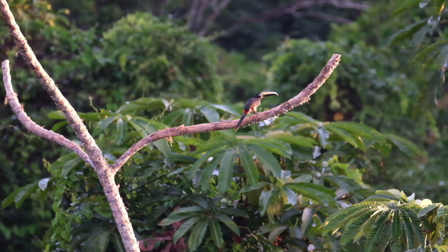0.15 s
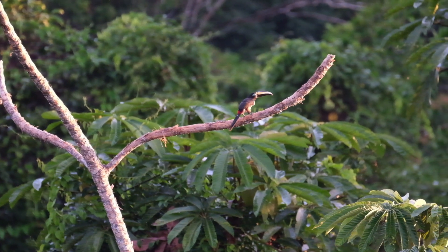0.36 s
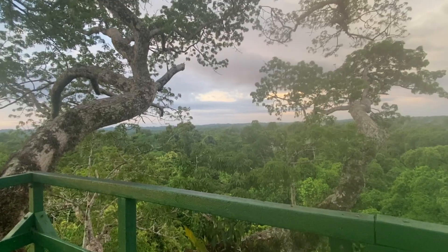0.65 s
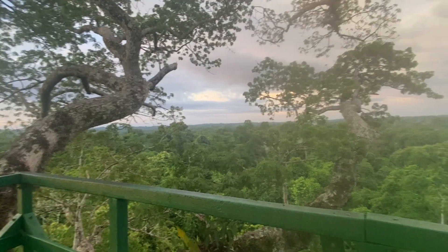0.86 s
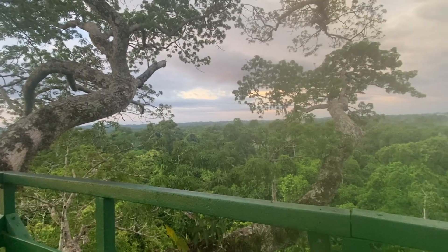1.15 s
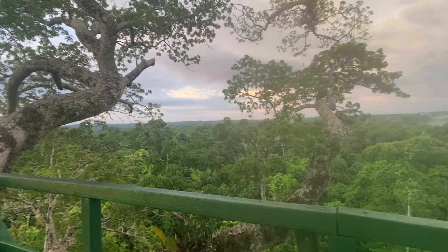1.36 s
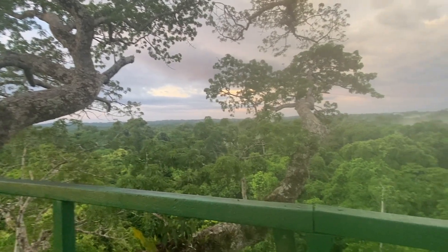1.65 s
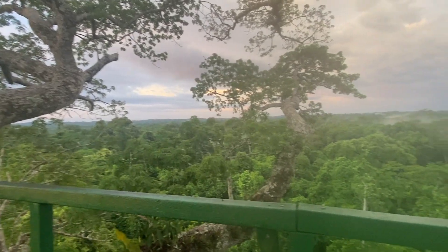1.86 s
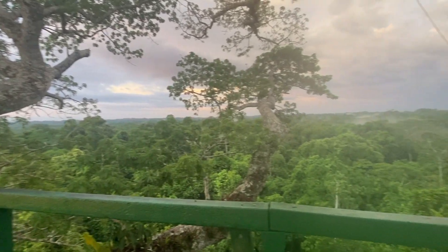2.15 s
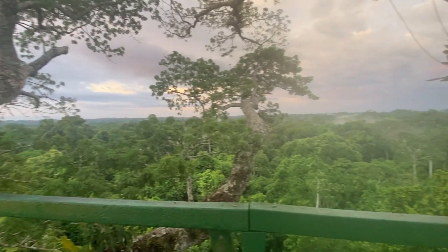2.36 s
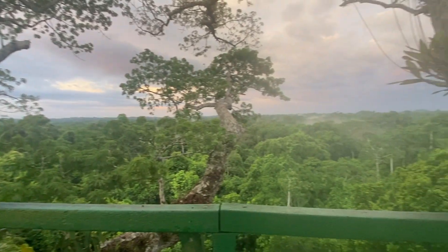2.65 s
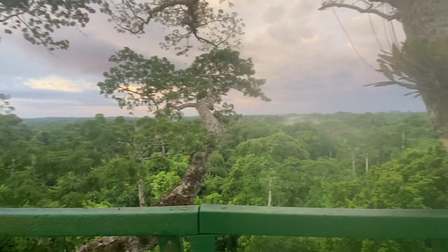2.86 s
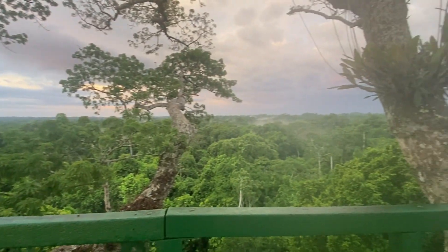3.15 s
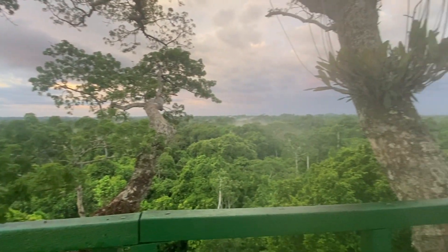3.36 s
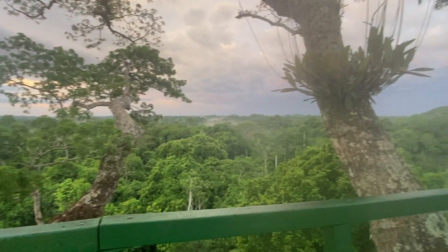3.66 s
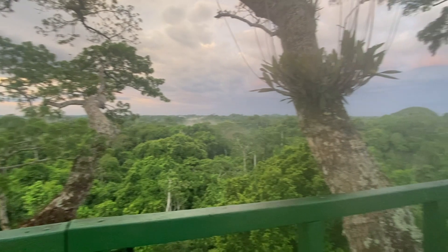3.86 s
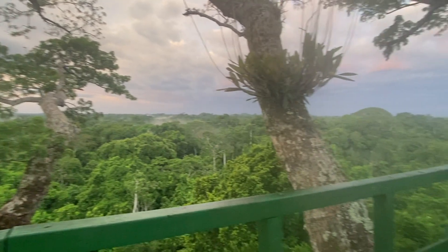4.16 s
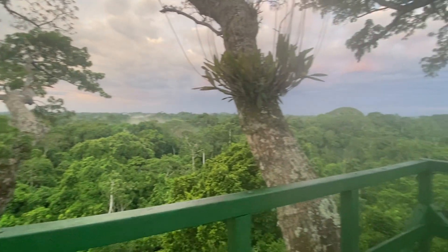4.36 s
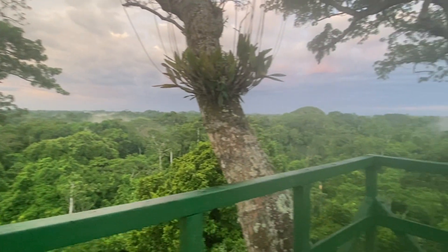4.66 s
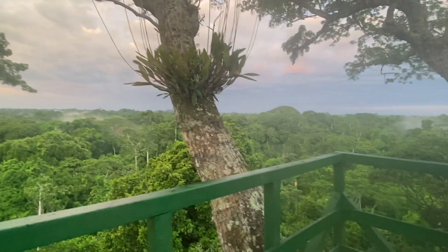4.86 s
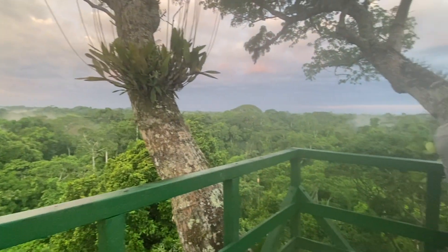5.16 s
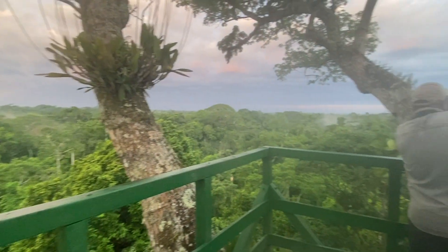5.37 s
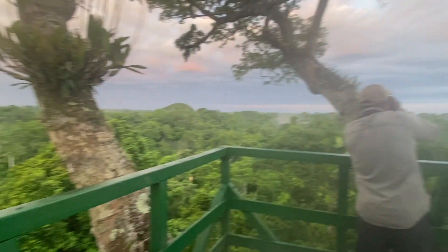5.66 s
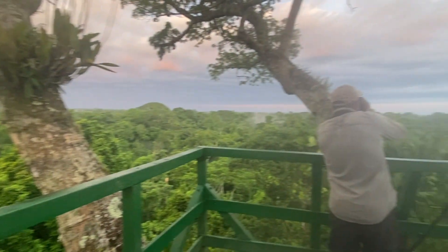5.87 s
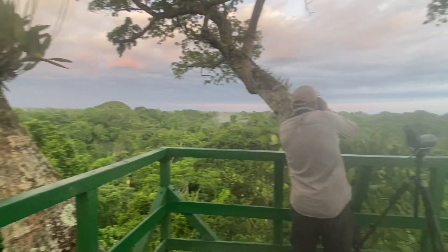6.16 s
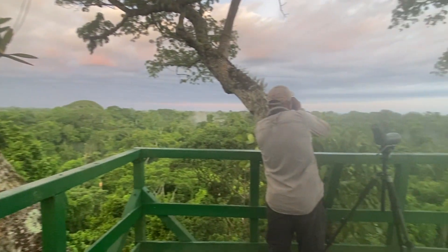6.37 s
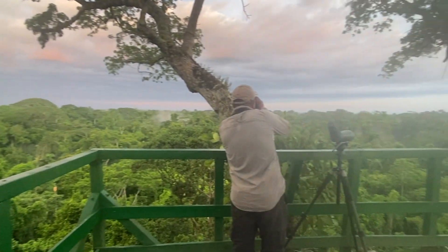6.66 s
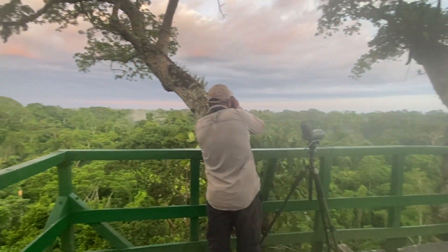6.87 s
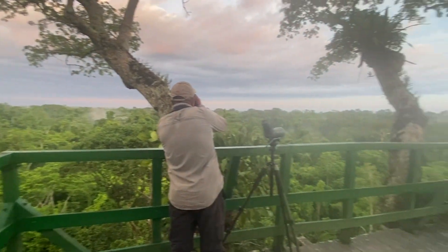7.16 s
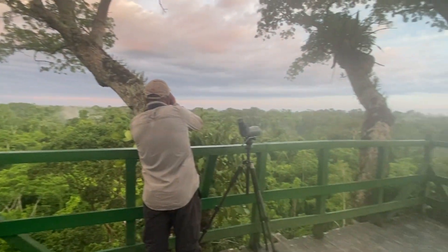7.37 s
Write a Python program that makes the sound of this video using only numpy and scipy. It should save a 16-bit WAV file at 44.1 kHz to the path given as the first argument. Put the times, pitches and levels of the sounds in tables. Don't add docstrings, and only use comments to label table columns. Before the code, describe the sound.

A stereo microphone in the open on a treetop platform catches steady insect hiss, rasping katydids and leafy background. Piping two-note bird calls come first, growing louder then softer, with a sharp chip and very high rising squeals. Later come gliding whistles, a long sagging note, faint coos and a climbing series. Low wind buffets and dull taps run throughout, broken by one hard casing clatter with a short motor whine.

```python
import sys
import numpy as np
from scipy import signal
from scipy.fft import rfft, irfft, next_fast_len
from scipy.io import wavfile
from scipy.ndimage import uniform_filter1d, minimum_filter1d, map_coordinates

SR = 44100
rng = np.random.default_rng(int(sys.argv[2]) if len(sys.argv) > 2 else 0)


def generate_wav(sig):
    pcm = np.round(np.clip(np.atleast_2d(sig).T, -1, 1) * 32767).astype(np.int16)
    wavfile.write(sys.argv[1], SR, pcm)


def invert_db(x):
    u = np.asarray(x, float) / 20
    return 10 ** u


N = 330750


def unit(x):
    return x / np.sqrt(np.mean(x ** 2) + 1e-20)


def along(points, hz):
    f, v = np.transpose(points)
    return np.interp(np.log(hz + 1), np.log(f + 1), v)


def curves(rows):
    s, *columns = np.transpose(rows)
    return [np.interp(np.arange(N) / SR, s, column) for column in columns]


def swells(rows):
    t = np.arange(N) / SR
    return sum(invert_db(db) * np.exp(-((t - s) / half) ** 2) for s, db, half in rows)


def wobble(rate):
    at = np.arange(0, N + 16, 16)
    knots = rng.standard_normal(int(N * rate / SR) + 4)
    return np.interp(np.arange(N), at, map_coordinates(knots, [at * rate / SR]))


def filtered(x, response):
    m = next_fast_len(N + SR // 2)
    return irfft(rfft(x, m) * response(np.fft.rfftfreq(m, 1 / SR)), m)[..., :N]


def coloured(x, spectrum):
    return unit(filtered(x, lambda hz: invert_db(along(spectrum, hz))))


def sides(pan_db):
    return invert_db(np.array([pan_db, -pan_db]) / 2)


def pair(alike):
    a, b = rng.standard_normal((2, N))
    turn = np.arccos(np.clip(alike, -1, 1)) / 2
    return np.array([np.cos(turn) * a + np.sin(turn) * b, np.cos(turn) * a - np.sin(turn) * b])


# (frequency [Hz], reverberation time [s])
TREE_DECAY = [(500, 1), (2300, 1.2), (8500, 1.1), (11000, .75)]


def trees(x):
    near_db, near_t60 = -4, .25
    _, t, z = signal.stft(hiss := rng.standard_normal((2, SR * 2 // 3)), SR, nperseg=256)
    hz = np.fft.rfftfreq(256, 1 / SR)
    far = invert_db(-60 * t / along(TREE_DECAY, hz)[:, None])
    near = invert_db(near_db - 60 * t / near_t60)
    tail = signal.istft(z * (far + near), SR, nperseg=256)[1]
    delayed = np.pad(x, (500, 0))[None]
    return signal.fftconvolve(delayed, tail / np.linalg.norm(tail[0]), axes=1)


def whistle(notes, pan_db, lead, wet_db, waver_db, partner=2, partner_db=-60, shift_db=0, stray_hz=8):
    out = np.zeros((2, N + 2 * SR))
    waver = invert_db(waver_db * wobble(60) + shift_db)
    stray = stray_hz * wobble(25)
    for note in notes:
        s, hz, db = np.transpose(note)
        n = np.arange(round(s[0] * SR), min(round(s[-1] * SR), N))
        t = n / SR
        hz = uniform_filter1d(np.interp(t, s, hz), size=SR // 150) + stray[n]
        edge = np.clip(np.minimum(t - s[0], s[-1] - t) / 0.0093, 0, 1)
        phase = 2 * np.pi * np.cumsum(hz) / SR + np.array([[lead], [-lead]]) / 2
        tone = np.sin(phase) + invert_db(partner_db) * np.sin(partner * phase)
        dry = np.sqrt(2) * invert_db(np.interp(t, s, db)) * edge * waver[n] * tone
        echo = invert_db(wet_db) * trees(dry[0])
        out[:, n] += sides(pan_db)[:, None] * dry
        out[:, n[0]:n[0] + echo.shape[1]] += echo
    return out[:, :N]


def drawn(length, top_hz, scoop_hz, settle, sag_hz, bend, attack, fade_db):
    t = np.linspace(0, length, 40)
    u = t / length
    hz = top_hz - scoop_hz * np.exp(-t / settle) - sag_hz * u ** bend
    db = 20 * np.log10(1.05 - np.exp(-t / attack)) - fade_db * u
    return np.transpose([t, hz, db])


def sung(shape, starts):
    return [np.array(shape) + [s, 0, db] for s, db in starts]


PIPER_ARCH = (.125, 2425, 400, .03, 110, 14, .025, 2)
PIPER_DROOP = (.105, 2385, 380, .008, 160, 3, .011, 6)
# (time [s], first note level [dB], second note level [dB])
PIPER_CALLS = [
    (.342, -51, -52),
    (.92, -52, -49.5),
    (1.519, -46, -45),
    (2.129, -44, -43.5),
    (2.791, -48.5, -51),
]


def piper():
    reply_s = .169
    first = sung(drawn(*PIPER_ARCH), [(s, db) for s, db, _ in PIPER_CALLS])
    second = sung(drawn(*PIPER_DROOP), [(s + reply_s, db) for s, _, db in PIPER_CALLS])
    return whistle(first + second, -0.33, -0.23, wet_db=-2.5, waver_db=5, shift_db=-.4, stray_hz=14)


# (time [s], pitch [Hz], level [dB])
ANSWER_NOTES = [
    [(3.14, 2470, -76), (3.18, 2547, -66), (3.28, 2615, -63.5), (3.37, 2630, -63.5), (3.42, 2390, -68)],
    [(3.49, 2810, -55), (3.54, 2950, -58), (3.59, 2670, -63), (3.7, 2370, -59.5), (3.74, 2140, -65)],
]
# (time from start [s], pitch [Hz], level [dB])
QUERY_NOTE = [(0, 2190, -2), (.06, 2240, -3), (.13, 2440, -1), (.19, 2470, 0)]
# (time [s], level [dB])
QUERY_TIMES = [
    (4.465, -66),
    (4.915, -62),
]


def answerer():
    notes = ANSWER_NOTES + sung(QUERY_NOTE, QUERY_TIMES)
    return whistle(notes, -1.9, 1.0, wet_db=-5.5, waver_db=3.5)


MOURNER_SHAPE = (.66, 2070, 420, .025, 400, 2.2, .04, 10)
# (time [s], level [dB])
MOURNER_CALLS = [
    (.24, -63),
    (2.92, -77),
    (5.44, -61),
]


def mourner():
    notes = sung(drawn(*MOURNER_SHAPE), MOURNER_CALLS)
    return whistle(notes, -1, 1.0, wet_db=-3.5, waver_db=3.5, shift_db=-1.5)


RISER_SHAPE = (.365, 10950, 3400, .165, -300, 22, .04, 15)
RISER_UPPER_SHAPE = (.34, 13300, 3700, .27, 0, 1.1, .011, .5)
# (time [s], level [dB], upper voice level [dB], upper voice shift [Hz])
RISER_CALLS = [
    (1.21, -57, -84, 100),
    (3.11, -55, -82, 200),
    (5.28, -57, -80, 300),
    (7.126, -63, -88, 100),
]


def riser():
    lower = sung(drawn(*RISER_SHAPE), [row[:2] for row in RISER_CALLS])
    start, _, end = np.split(drawn(*RISER_UPPER_SHAPE), [7, 16])
    upper = [part + [s, hz, db] for s, _, db, hz in RISER_CALLS for part in (start, end)]
    return whistle(lower + upper, -2.7, 1.9, wet_db=-4.5, waver_db=4.5, shift_db=.8, stray_hz=40)


CHIP_SHAPE = (.035, 3000, -5200, .023, 0, 1.1, .011, 6)
# (time [s], pitch shift [Hz], level [dB])
CHIP_CALLS = [
    (2.262, 0, -42.5),
    (6.262, 500, -51),
]


def chips():
    notes = [drawn(*CHIP_SHAPE) + row for row in CHIP_CALLS]
    return whistle(notes, 2.81, 0.1, wet_db=-8, waver_db=2.2, partner_db=-40)


LADDER_SHAPE = (.1, 0, 10, .011, 110, 2.6, .012, 4)
# (time [s], pitch [Hz], level [dB])
LADDER_NOTES = [(6.3, 1480, -74), (6.515, 1545, -72), (6.72, 1580, -70), (6.93, 1600, -74),
                (7.12, 1645, -70), (7.315, 1665, -68)]


def ladder():
    notes = [drawn(*LADDER_SHAPE) + row for row in LADDER_NOTES]
    return whistle(notes, 0, 0.97, wet_db=-.6, waver_db=3.5, shift_db=-2.5, stray_hz=14)


COO_SHAPE = (1.01, 0, 15, .05, 12, 1.1, .03, 4)
# (time [s], length [s], pitch [Hz], level [dB])
DOVE_COOS = [(1.22, .22, 1282, -69), (1.5, .28, 1276, -71), (1.88, .3, 1240, -70), (5.89, .23, 1247, -69),
             (6.28, .52, 1250, -67), (6.94, .2, 1205, -67), (6.35, .75, 1335, -78), (7.23, .1, 1300, -65),
             (7.37, .09, 1335, -67), (7.43, .1, 1240, -69)]


def doves():
    notes = [drawn(length, hz, *COO_SHAPE[2:]) + [s, 0, db] for s, length, hz, db in DOVE_COOS]
    return whistle(notes, 0, -2.6, wet_db=-2.5, waver_db=3.5, shift_db=2.5, stray_hz=9)


# (time [s], length [s], from [Hz], to [Hz], level [dB])
FAR_SLURS = [(1.19, .045, 1970, 1792, -68), (1.235, .04, 1792, 1960, -69), (1.33, .115, 2090, 1800, -70),
             (1.72, .13, 1850, 2000, -71), (5.88, .09, 2030, 2120, -74), (6.1, .11, 2150, 2380, -76),
             (6.19, .11, 2180, 2310, -74), (6.33, .07, 2280, 2170, -73), (6.39, .05, 2040, 2150, -74),
             (6.44, .08, 2100, 1980, -74), (6.62, .06, 2110, 2130, -75), (5.95, .25, 1865, 1855, -77),
             (6.04, .05, 2240, 2320, -76), (7.4, .1, 2150, 2350, -75), (7.2, .04, 2000, 2350, -71),
             (3.3, .08, 1640, 1620, -77), (6.2, .11, 2030, 2120, -74), (6.92, .07, 2240, 2300, -75),
             (7.21, .025, 2090, 2030, -64), (1.55, .1, 1800, 1856, -69), (1.59, .03, 2600, 2640, -70),
             (1.61, .035, 2800, 2870, -67), (.44, .2, 1790, 1802, -77), (1.9, .14, 1793, 1860, -68)]


def murmur():
    notes = [[(s, start_hz, db), (s + length, end_hz, db)] for s, length, start_hz, end_hz, db in FAR_SLURS]
    return whistle(notes, -1.1, 1.1, wet_db=-1.5, waver_db=3.5, shift_db=-4)


def birds():
    return (piper() + answerer() + mourner() + murmur() + ladder()
            + doves() + riser() + chips())


# (frequency [Hz], density [dB per Hz])
CICADA_SPECTRUM = [(4500, -74), (4900, -14), (5150, -20), (5460, -9.5), (6220, 2), (7130, 2), (7650, -8),
                   (7850, -26), (8300, -29.5), (8800, -120)]


def cicadas():
    clicks = np.zeros((2, N))
    for rate, pan, lag in rng.uniform([90, -8, 0], [380, 8, 40], (16, 3)):
        cycles = np.cumsum(rate * (1 + .06 * wobble(3)) / SR)
        train = np.diff(np.floor(cycles), prepend=0)
        train[train > 0] = invert_db(3.5 * rng.standard_normal(int(train.sum())))
        train = unit(train)
        clicks += sides(pan)[:, None] * [train, np.roll(train, int(lag))]
    mix = .5 * unit(clicks) + invert_db(0.87 * wobble(12)) * pair(0.2)
    return invert_db(-54) * sides(3.4)[:, None] * coloured(mix, CICADA_SPECTRUM)


# (frequency [Hz], lead of the left [rad])
PORT_PHASE = [(8800, 10), (10200, 6.5), (11600, 6), (14800, .5), (15500, -.1)]


def skewed(x):
    return filtered(x, lambda hz: np.exp(.5j * along(PORT_PHASE, hz) * np.array([[1], [-1]])))


# (time [s], peak level [dB], rasps, spacing [s])
KATYDID_BOUTS = [(.4372, -66, 4, .144), (1.0185, -54, 3, .137), (2.142, -71, 1, .1), (2.9437, -72, 1, .1),
                 (3.115, -68, 1, .1), (3.35, -76, 1, .1), (3.6162, -70, 2, .15), (4.1355, -69.5, 2, .155),
                 (4.447, -66, 1, .1), (4.9082, -68, 3, .144), (5.6, -73, 4, .147), (6.6694, -72, 2, .18),
                 (7.015, -75, 2, .11)]
# (frequency [Hz], density [dB per Hz])
RASP_SPECTRUM = [(8000, -48), (8800, -6), (10000, -9), (12200, -6), (13000, -10), (14500, -4.5),
                 (15750, -5), (15900, -58)]
BLUR_SPECTRUM = [(10600, -52.5), (11200, -6), (12300, -5), (12800, -51), (13500, -48.5), (14100, -3),
                 (14900, -11), (15500, -54)]
# (time [s], half length [s], level [dB])
FAR_SWELLS = [(.95, .4, -85), (2.1, .45, -90), (2.65, .25, -97), (2.9, .1, -93), (3.6, .2, -91),
              (4.3, .22, -86), (5.1, .22, -87), (5.65, .2, -90), (6.85, .2, -89)]


def katydids():
    swell, t = np.zeros(N + SR), np.arange(SR // 5) / SR
    rasp = t / .012 * np.exp(1 - t / .012) + .12 * np.exp(-t / .08)
    for s, db, rasps, gap in KATYDID_BOUTS:
        for k in range(round(rasps)):
            swell[round((s + k * gap) * SR):][:len(t)] += invert_db(db - 7) * rasp
    teeth = invert_db(2.27 * wobble(400))
    near = swell[:N] * teeth * sides(-0.6)[:, None] * skewed(coloured(pair(0.9), RASP_SPECTRUM))
    far_level = invert_db(-86.5) + swells([(s, db, half) for s, half, db in FAR_SWELLS])
    far = far_level * invert_db(1.5 * wobble(7.9)) * invert_db(-1.5) * skewed(coloured(pair(0.5), BLUR_SPECTRUM))
    return near + far


def bouts(rows, tires_db):
    rise_s = .04
    t = np.arange(N) / SR
    gains = np.array([invert_db(db - tires_db * (t - s) / length)
                      * np.clip(np.minimum(t - s, s + length - t) / rise_s, 0, 1)
                      for s, length, _, db in rows])
    gain = gains.sum(0)
    return np.transpose(rows)[2] @ gains / (gain + 1e-12), gain


# (resonance [Hz], width [Hz], level [dB], chirp rate [1/s], depth [dB], left-right [dB])
STEADY_CRICKETS = [
    (5638, 76, -67, 24, -1, 1),
    (4620, 170, -73.5, 9, 2, -4.5),
    (4385, 540, -71, 5, 10, 2.5),
]
# (time [s], length [s], wing pitch [Hz], level [dB])
TREE_CRICKET_BOUTS = [(.44, 7.1, 4150, -82), (2.45, .2, 4125, -70), (2.56, .09, 4125, -67),
                      (2.7, .1, 4125, -67), (2.8, .16, 4120, -73), (3.12, .1, 4110, -72),
                      (4.35, .5, 4030, -76), (4.95, .5, 4130, -69), (5.46, .45, 4215, -62)]
LOW_CRICKET_BOUTS = [(.4, .24, 3310, -69), (2.4, 1.3, 3200, -77), (3.7, 2.1, 3300, -81),
                     (5.8, 1.9, 3440, -72)]


def crickets():
    out = np.zeros((2, N))
    for track, scatter_hz, tires_db in (TREE_CRICKET_BOUTS, 25, 6), (LOW_CRICKET_BOUTS, 110, 2.1):
        hz, gain = bouts(track, tires_db)
        scatter = scatter_hz * np.array([wobble(150), wobble(150)])
        phase = 2 * np.pi * np.cumsum(hz + scatter, axis=1) / SR
        out += gain * invert_db(2 + 1.8 * wobble(45)) * np.sin(phase)
    for hz, width, db, rate, depth_db, pan in STEADY_CRICKETS:
        ring = filtered(pair(0.12), lambda f: (1j * f * width / (hz * hz - f * f + 1j * f * width)) ** 2)
        out += invert_db(db + min(depth_db, 2) * wobble(rate)) * sides(pan)[:, None] * unit(ring)
    return out


# (time [s], level [dB])
WIND_STRENGTH = [(0.62, -57), (0.68, -54), (1.02, -65), (1.37, -61), (1.69, -71), (2.3, -60), (3.01, -55),
                 (3.3, -61), (4.55, -59), (4.76, -65), (5.06, -68), (5.56, -76), (6.06, -69), (6.89, -79),
                 (7.29, -77), (7.5, -65)]
# (time [s], correlation)
PORT_LIKENESS = [(0, 1), (3.9, 1), (4.4, -.1), (7.5, -.45)]
# (frequency [Hz], density [dB per Hz])
BUFFET_SPECTRUM = [(12, -42.5), (20, -19), (43, 4), (70, 7), (113, -6.5), (170, -7), (220, -35.5),
                   (370, -120)]
FLUTTER_SPECTRUM = [(65, -26.5), (110, -1.5), (156, -8), (210, -5), (247, -6), (600, -46), (780, -81.5),
                    (1320, -120)]
# (time [s], swing [Hz], left [dB], right [dB])
EDDIES = [(0.536, 84, -39, -34), (0.699, 160, -30, -31.5), (0.743, 74, -37.5, -44.5),
          (0.862, 82, -35, -40.5), (1.235, 110, -36, -35), (1.332, 149, -40, -37),
          (2.008, 227, -41, -37), (2.157, 247, -33, -31), (2.314, 75, -37, -44), (1.52, 70, -43, -43),
          (2.656, 107, -35.5, -33), (2.714, 115, -31.5, -30.5), (2.937, 84, -37.5, -34.5),
          (3.017, 99, -24.5, -26.5), (3.054, 125, -34.5, -34.5), (3.113, 74, -37, -36),
          (1.75, 80, -41, -41), (3.626, 80.5, -33.5, -31.5), (3.749, 179, -46, -39.5),
          (4.015, 93, -33, -41), (4.307, 92.6, -38, -51), (4.357, 81.5, -36, -41),
          (4.488, 139, -35.5, -53), (4.571, 83, -26, -41), (4.961, 79, -39, -44),
          (5.003, 100, -32, -44), (5.939, 150, -25, -30), (5.979, 66, -26, -31),
          (6.704, 115, -36, -39), (7.356, 115, -30, -42),
          (.499, 125, -41, -41), (.652, 77, -44, -44), (1.261, 95, -41, -41), (1.83, 116, -46, -46),
                (2.421, 70, -40, -40), (2.597, 96, -41, -41), (2.846, 80, -41, -41), (3.163, 72, -37, -37),
                (3.245, 88, -44, -44), (3.382, 113, -41, -41), (3.416, 103, -40, -40),
                (3.511, 103, -43, -43), (3.872, 89, -39, -39), (4.05, 158, -42, -42), (4.19, 81, -42, -39),
                (4.627, 89, -44, -42), (4.703, 74, -42, -45), (4.787, 76, -42, -44), (4.933, 95, -44, -43),
                (5.05, 76, -42, -42), (5.168, 132, -48, -47), (5.221, 102, -47, -46), (5.76, 140, -47, -51),
                (5.888, 119, -40, -42), (6.044, 115, -42, -41), (6.167, 135, -43, -43),
                (6.304, 68, -43, -46), (6.333, 150, -44, -44), (6.43, 95, -43, -45), (6.637, 98, -46, -50),
                (6.902, 110, -45, -46), (7.183, 158, -44, -46), (7.315, 120, -44, -45),
                (7.38, 80, -42, -38), (.674, 80, -38, -38), (.82, 75, -42, -42), (.85, 200, -43, -43),
                (1.999, 280, -43, -43), (2.04, 70, -42, -42), (2.146, 230, -37, -37), (5.912, 75, -33, -38),
                (5.931, 240, -39, -43), (7.349, 200, -36, -42)]
BREEZE_DB = -60


def wind():
    strength_db, = curves(WIND_STRENGTH)
    alike, = curves(PORT_LIKENESS)
    buffet_db = strength_db - 3
    flutter_db = -68 + .35 * (strength_db - BREEZE_DB)
    buffet = unit(invert_db(3.5 * wobble(14)) * coloured(pair(alike), BUFFET_SPECTRUM))
    flutter = unit(invert_db(4.4 * wobble(35)) * coloured(pair(0.93 * alike), FLUTTER_SPECTRUM))
    boost = 1 / np.sqrt(.5 + .5 * np.clip(alike, -.6, 1))
    swings, spray, wake = np.zeros((3, 2, N + SR))
    half = SR // 20
    t = np.arange(-half, half) / SR
    eddies = EDDIES
    for (s, hz, *dbs), turn in zip(eddies, rng.uniform(-np.pi, np.pi, (len(eddies), 2))):
        at = round(s * SR)
        span = slice(at - half, at + half)
        gain = invert_db(np.array(dbs))[:, None]
        apart = np.arccos(np.clip(alike[at], -1, 1)) + .03 * turn[1]
        start = turn[0] + np.array([[0], [apart]])
        cycles = hz * t
        phase = 2 * np.pi * cycles * (1 - 0.36 * np.tanh(cycles)) + start
        swings[:, span] += gain * np.exp(-(cycles / np.where(t < 0, .6, .9)) ** 2) * np.cos(phase)
        spray[:, span] += gain * hz / 150 * np.exp(-(t / np.where(t < 0, .007, .024)) ** 2)
        wake[:, span] += gain * np.exp(-(t / 0.035) ** 2)
    shed = invert_db(-16) * spray[:, :N] * coloured(pair(alike), FLUTTER_SPECTRUM)
    dragged = invert_db(-19) * wake[:, :N] * buffet
    steady = boost * (invert_db(buffet_db + 6.5) * buffet + invert_db(flutter_db + 0.5) * flutter)
    return swings[:, :N] + dragged + shed + steady


# (time [s], peak level [dB], edge level [dB])
BUMPS = [(.495, -61, -20), (.659, -76, 8), (2.142, -51, -11), (4.772, -59, -15), (5.752, -60, -15),
         (5.93, -59, -15), (6.163, -59, -20), (6.328, -58, -20), (7.18, -61, -15), (7.348, -55, -15),
         (0.694, -57.5, -12.5), (0.812, -62.5, -9), (1.321, -49, -29), (1.457, -57, 4), (1.996, -51.5, -29),
         (2.128, -48, -26), (2.815, -57.5, -4), (3.369, -57.5, -22), (3.43, -54, -20), (3.495, -54, -19),
         (4.017, -51, -25), (4.131, -53, -7.5), (4.63, -64.5, -13), (5.854, -58.5, -6), (6.047, -55, -25),
         (6.232, -56, -20), (6.416, -54, -3), (6.682, -53, -42), (6.909, -57.5, 5.5)]


def taps():
    puff, edge = np.zeros((2, 2, N + SR))
    t = np.arange(SR // 12) / SR
    for s, db, edge_db in BUMPS:
        at = round(s * SR)
        body = invert_db(db - 60 * t / 0.12) * (1 - np.exp(-t / 0.0023))
        puff[:, at:at + len(t)] += body
        edge[:, at:at + len(t)] += body * invert_db(edge_db - 11)
    dull = coloured(pair(0.27 * curves(PORT_LIKENESS)[0]),
                    [(120, -17), (300, 12), (1100, -18), (1600, -28), (2000, -120)])
    thin = coloured(pair(0.55), [(900, -14), (1300, 3), (5000, -28), (8000, -42), (9000, -120)])
    return invert_db(5.5) * puff[:, :N] * dull + edge[:, :N] * thin


def casing(modes):
    def response(f):
        ring = sum((-1) ** k * invert_db(db) * 1j * f * width / (hz * hz - f * f + 1j * f * width)
                   for k, (hz, width, db) in enumerate(modes))
        return ring / (1 + 1j * f / 5000) ** 2
    return response


# (time [s], peak level [dB])
RATTLE_CONTACTS = [
    (5.297, -41),
    (5.306, -35),
    (5.314, -37),
    (5.322, -34),
    (5.337, -38),
    (5.35, -46),
]
# (frequency [Hz], width [Hz], level [dB])
CASING_MODES = [(620, 520, -4), (1510, 600, -9), (2420, 320, 0.5), (3350, 530, -10)]
# (time [s], pitch [Hz], level [dB])
MOTOR_WHINE = [
    [(5.38, 2200, -65), (5.54, 2215, -66.5), (5.61, 2170, -74), (5.69, 2190, -80)],
]


def mechanism():
    swell, t = np.zeros(N + SR), np.arange(SR // 20) / SR
    for s, db in RATTLE_CONTACTS:
        swell[round(s * SR):][:len(t)] += invert_db(db - 60 * t / 0.096)
    swell = swell[:N]
    hollow_db, hollow_t60 = 1.5, .12
    since = np.clip(np.arange(N) / SR - RATTLE_CONTACTS[1][0], 0, 1)
    fading = invert_db(hollow_db - 60 * since / hollow_t60)
    upper = filtered(swell * pair(0.62), casing(CASING_MODES[1:]))
    lowest = filtered(fading * swell * pair(0.6), casing(CASING_MODES[:1]))
    whine = whistle(MOTOR_WHINE, -3, 1.2, wet_db=-14, waver_db=.7, partner=.25, partner_db=-11)
    return invert_db(-1) * (upper + lowest) + whine


# (time [s], level [dB], half length [s])
SCRAPES = [(0.737, -66.5, 0.067), (2.15, -54, 0.026), (3.498, -68.5, 0.063), (4.003, -67, 0.22),
           (4.705, -69, 0.13), (7.255, -73, 0.3)]
LEAF_STIRS = [(.66, -74, .02), (.73, -74, .025), (2.265, -72, .018), (2.9, -75, .035), (3.58, -75, .1),
              (3.82, -76, .05), (3.93, -77, .08), (4.14, -77, .03), (4.46, -75, .025), (6.27, -76, .02),
              (7.03, -77, .05)]


def rustle():
    leaves = swells(LEAF_STIRS) * coloured(
        pair(0.4), [(7000, -40), (8200, -1), (9300, -4), (10600, -9), (11500, -60)])
    cloth = coloured(pair(0.13), [(400, -65), (800, -8), (2000, -10), (3500, -14), (6000, -10.5),
                                  (8500, -17), (10500, -120)])
    return leaves + swells(SCRAPES) * invert_db(3.6 * wobble(70)) * cloth


# (frequency [Hz], density [dB per Hz])
FOREST_SPECTRUM = [(150, -30), (250, -15), (354, -1), (681, -14), (1150, -11), (1630, -13), (2170, -6),
                   (2730, -16), (3770, -15), (4510, -16), (5000, -22), (5400, -1), (7020, -45.5),
                   (11900, -120)]


def forest():
    z = signal.stft(pair(-0.5), nperseg=512)[2]
    patches = uniform_filter1d(rng.standard_normal(z.shape[1:]), 6, 0)
    patches = uniform_filter1d(patches, 14, 1)
    hiss = signal.istft(z * invert_db(2.86 * unit(patches)), nperseg=512)[1][:, :N]
    level_db = -87 + .05 * (curves(WIND_STRENGTH)[0] - BREEZE_DB) + 21.5
    return invert_db(level_db) * coloured(hiss, FOREST_SPECTRUM)


def scene():
    return (birds() + cicadas() + katydids() + crickets() + wind() + taps()
            + mechanism() + rustle() + forest())


# (frequency [Hz], level [dB per bin])
BAND_THRESHOLD = [(7600, -125), (8200, -101), (11000, -103), (15900, -105)]


def band_gated(x):
    z = signal.stft(x, SR, nperseg=2048)[2]
    hz = np.fft.rfftfreq(2048, 1 / SR)[4:1024:8]
    bands = z[:, :1024].reshape(2, 128, 8, -1)
    db = 10 * np.log10(np.mean(np.abs(bands) ** 2, (0, 2)) + 1e-20)
    below = -minimum_filter1d(-db, size=7, axis=0, origin=3)
    below = -minimum_filter1d(-below, size=3, axis=1, origin=1) - 37
    shadow = np.where(hz[:, None] > 1750, below, -200)
    limit = np.maximum(along(BAND_THRESHOLD, hz)[:, None], shadow)
    keep = db + 2.5 * rng.standard_normal(db.shape) > limit
    z[:, :1024] = (bands * keep[:, None]).reshape(2, 1024, -1)
    return signal.istft(z, SR, nperseg=2048)[1][:, :N]


def top_cut(x):
    return signal.sosfilt(signal.butter(12, 15910, fs=SR, output="sos"), x)


def record(dry):
    start_s, opening_s = .4385, .001
    gate = np.clip((np.arange(N) / SR - start_s) / opening_s, 0, 1)
    mix = band_gated(dry) * gate
    return top_cut(mix)


dry = scene()
out = record(dry)
generate_wav(out)
```